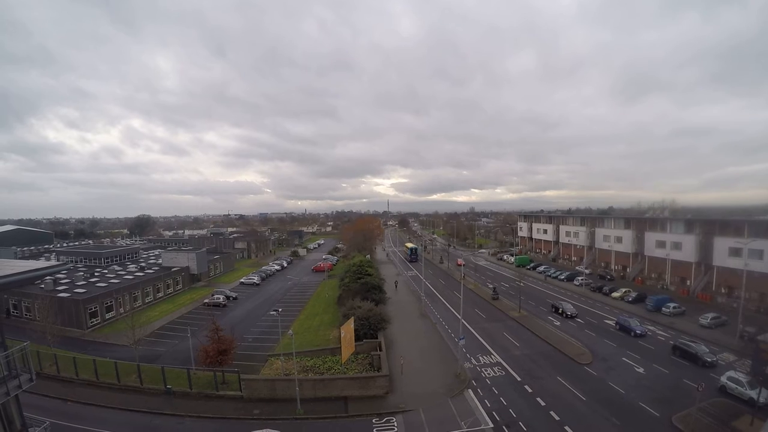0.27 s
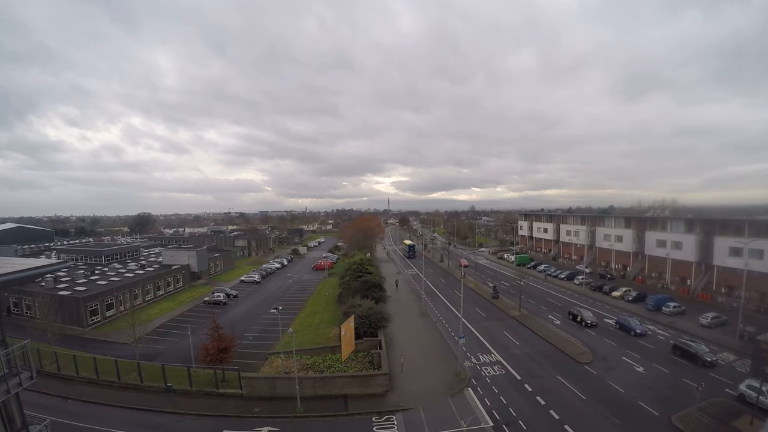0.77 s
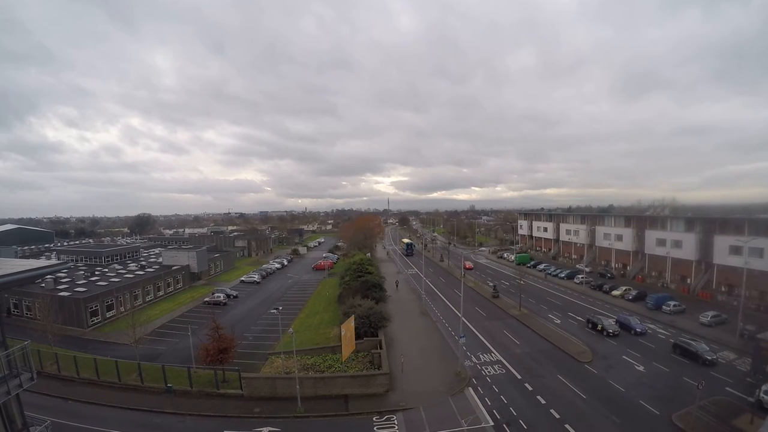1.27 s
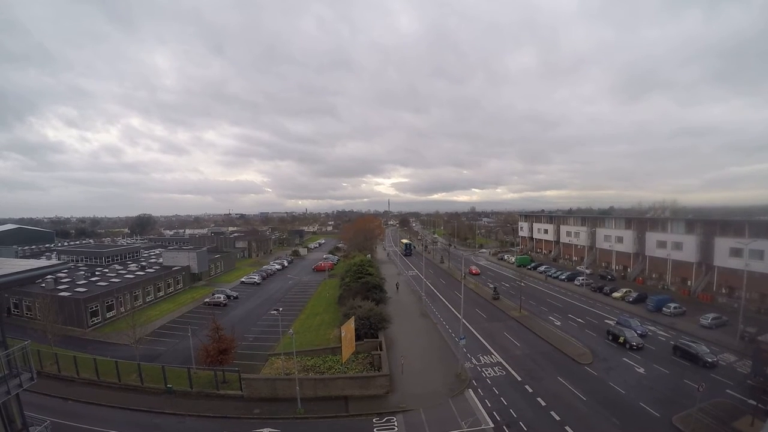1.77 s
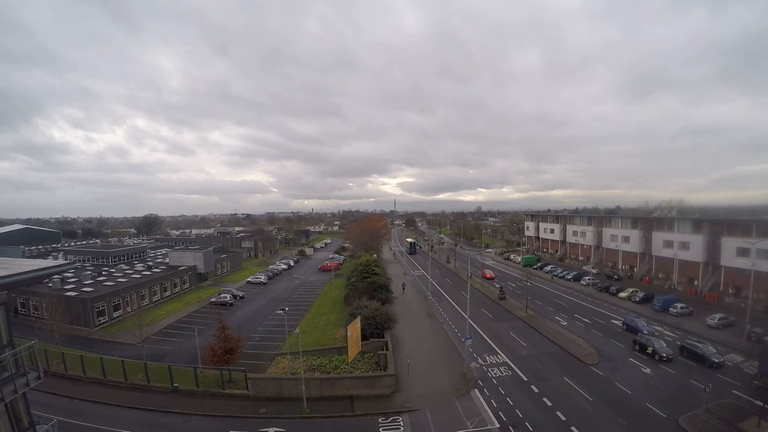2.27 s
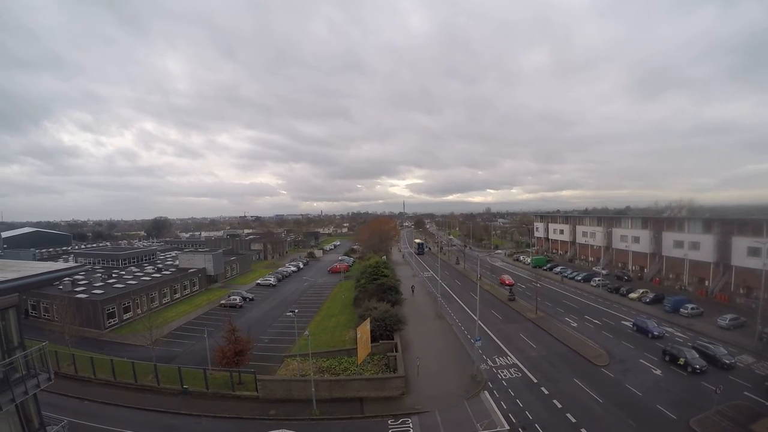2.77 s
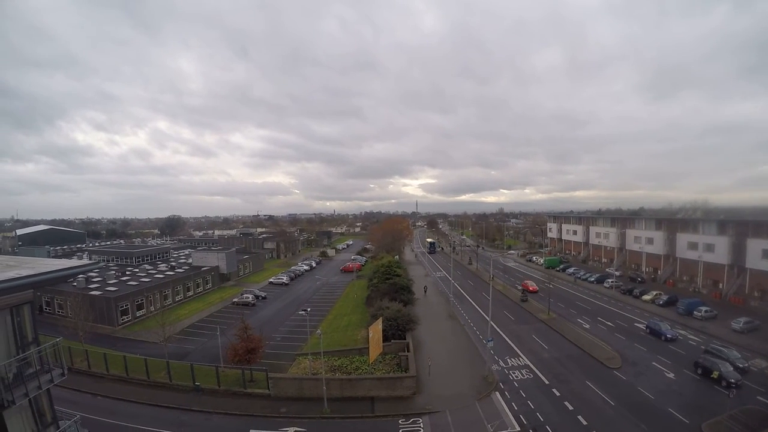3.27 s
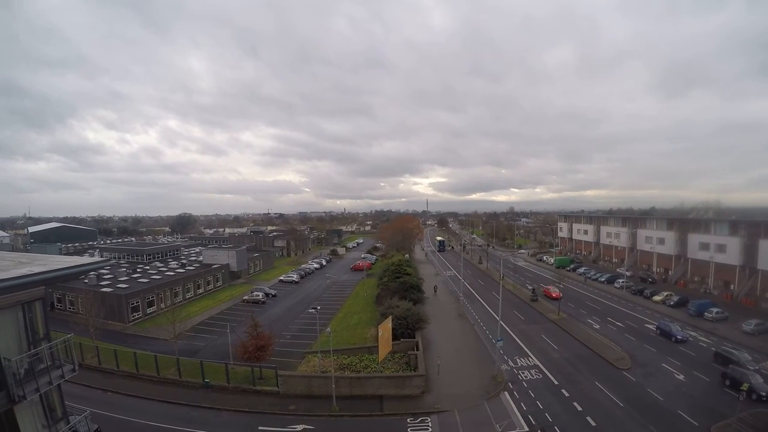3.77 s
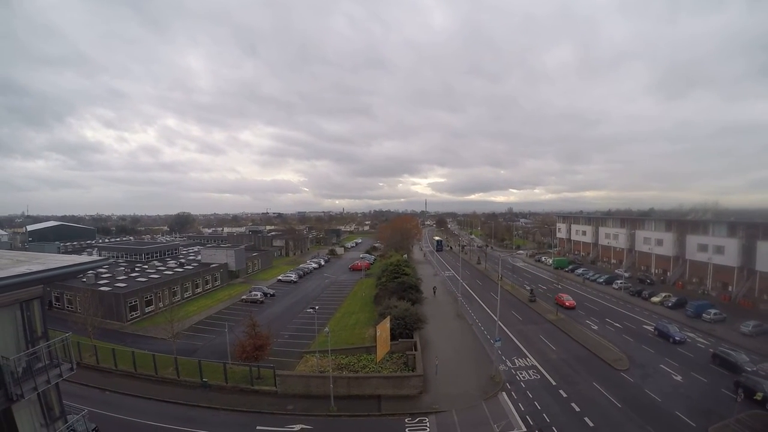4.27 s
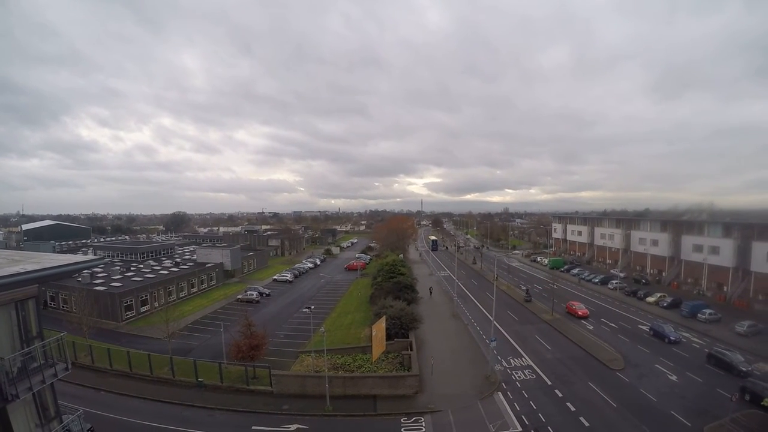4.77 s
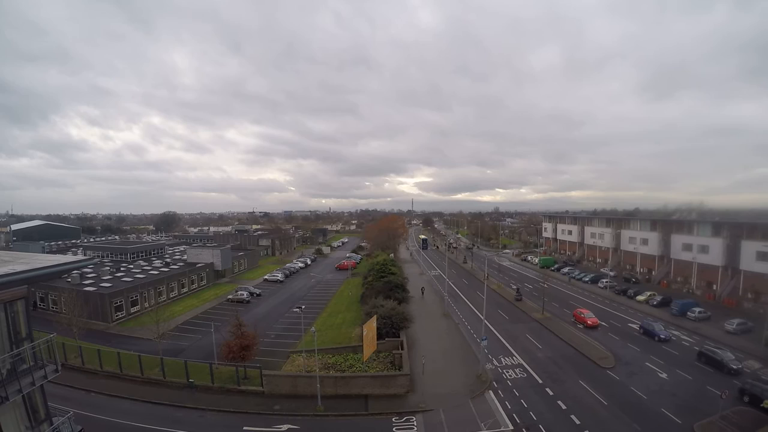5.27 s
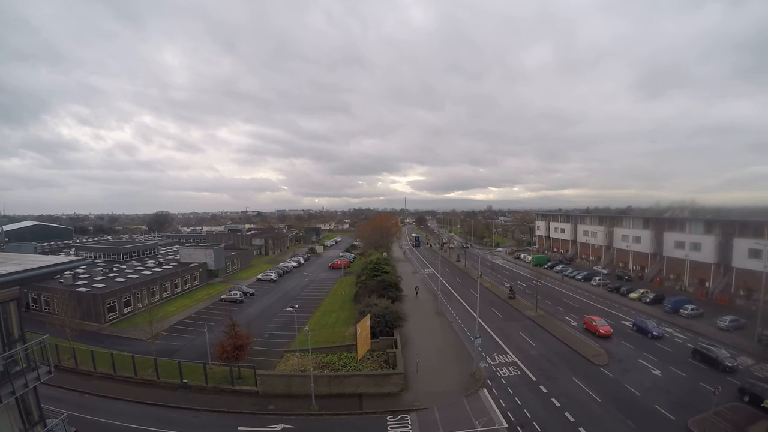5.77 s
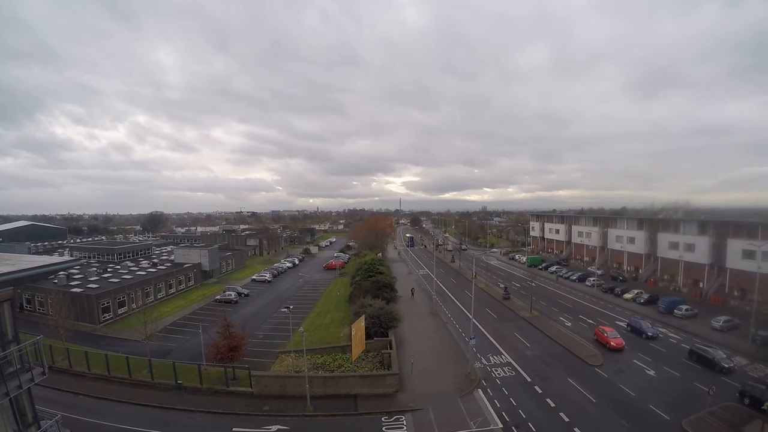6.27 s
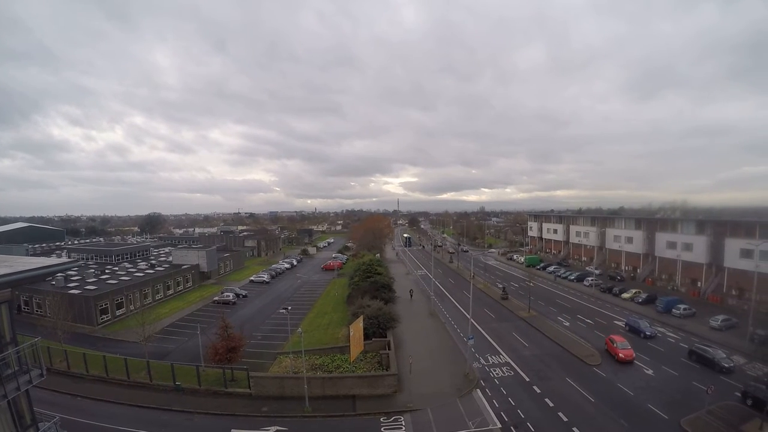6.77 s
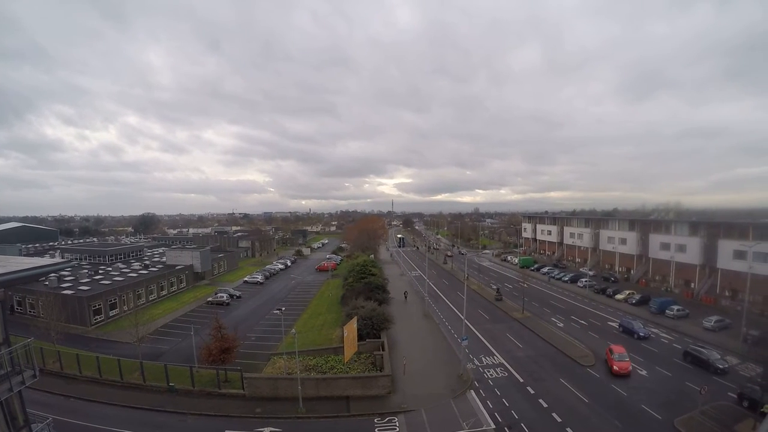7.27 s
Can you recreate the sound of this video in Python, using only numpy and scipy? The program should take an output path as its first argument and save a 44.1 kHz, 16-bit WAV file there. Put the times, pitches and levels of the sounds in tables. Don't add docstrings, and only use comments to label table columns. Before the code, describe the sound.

Open urban outdoors, small boxy camera microphone high above traffic. Continuous tyre and engine rumble sits under irregular low wind buffets. A turning wheel squeaks about eight times a second, growing fainter. An airy brake release comes early; an engine note sinks around five seconds, then a shorter, louder brake puff chirps. The close brings a thud, dense metallic clatter and brief singing squeal.

```python
import sys
import numpy as np
from scipy import signal
from scipy.fft import rfft, irfft
from scipy.io import wavfile
from scipy.ndimage import uniform_filter1d

SR = 44100
rng = np.random.default_rng(int(sys.argv[2]) if len(sys.argv) > 2 else 0)


def generate_wav(sig):
    pcm = np.round(np.clip(np.atleast_2d(sig).T, -1, 1) * 32767).astype(np.int16)
    wavfile.write(sys.argv[1], SR, pcm)


def invert_db(level):
    return 10 ** (np.asarray(level, dtype=float) / 20)


N = 331191
TIME = np.arange(N) / SR
HZ = np.maximum(np.arange(N // 2 + 1) * SR / N, 1)


def unit(x):
    return x / np.sqrt(np.mean(x ** 2))


def colour(points):
    hz, db = np.transpose(points)
    return invert_db(np.interp(np.log(HZ), np.log(hz), db, left=-140, right=-140))


def peaks(table):
    return invert_db(sum(db / (1 + (2 * (HZ - hz) / width) ** 2) for hz, width, db in table))


def shaped(x, gain):
    return unit(irfft(rfft(x) * gain, N))


def noise_of(points):
    return shaped(rng.standard_normal(N), colour(points))


def smooth_twice(x, span):
    return uniform_filter1d(uniform_filter1d(x, span), span)


def walk(rate):
    k = int(SR / rate)
    levels = np.repeat(rng.standard_normal(N // k + 1), k)
    return unit(smooth_twice(levels, k)[:N])


def steady(x, span):
    return unit(x / np.sqrt(smooth_twice(x ** 2, int(span * SR)) + 0.017))


def hold(table):
    s, db = np.transpose(table)
    return invert_db(np.interp(TIME, s, db))


def burst(s, db, rise, hold_s, fade):
    return invert_db(db - rise * np.maximum(s - TIME, 0) - fade * np.maximum(TIME - s - hold_s, 0))


def bumps(table, column):
    t = TIME[::64]
    power = sum(invert_db(row[column] - 24 * ((t - row[0]) / row[-1]) ** 2) ** 2 for row in table)
    return np.interp(TIME, t, power)


def tone(table, waver):
    s, hz, db = np.transpose(table)
    level = invert_db(np.interp(TIME, s, db, left=-140, right=-140))
    pitch = np.interp(TIME, s, hz) * (1 + waver * walk(150.))
    return level * np.sin(2 * np.pi * np.cumsum(pitch) / SR)


def patchy(gain, shared_db, own_db, rate):
    spectrum, common, out = rfft(rng.standard_normal(N)) * gain, walk(rate), 0
    place = 2 * np.log2(HZ)
    for band in range(12, 29):
        share = np.cos(np.pi / 2 * np.clip(place - band, -1, 1)) ** 2
        flicker = invert_db(shared_db * common + own_db * walk(rate))
        out = out + irfft(spectrum * share, N) * flicker
    return unit(out)


def traffic():
    # (frequency [Hz], density [dB per Hz])
    roar_colour = [(70, -34), (130, -18.5), (165, -1), (240, 0), (360, -4), (445, -3), (520, -10.5),
                   (750, -11), (840, -10), (1050, -11.5), (1330, -14.5), (2570, -20.5), (2980, -16),
                   (3350, -41)]
    # (frequency [Hz], density [dB per Hz])
    hiss_colour = [(2600, -23), (3100, 0.5), (4100, -1), (4900, -4), (5500, -8), (6500, -11.5), (7900, -15),
                   (8700, -21.5), (11000, -30)]
    # (time [s], level re mean [dB])
    flow_levels = [
        (0, .3),
        (.6, -.2),
        (2.3, .8),
        (3.3, -.4),
        (4.25, -.5),
        (4.85, .3),
        (5.5, -.7),
        (6.4, -.3),
        (7.1, .4),
    ]
    roar_db, hiss_db, hiss_follow = -39.8, -59, 1.3
    roar = patchy(colour(roar_colour), .12, 0.4, rate=5.)
    hiss = patchy(colour(hiss_colour), 0.3, 0.45, rate=11.)
    flow = hold(flow_levels)
    return roar * invert_db(roar_db) * flow + hiss * invert_db(hiss_db) * flow ** hiss_follow


def housing(sound):
    # (frequency [Hz], width [Hz], gain [dB])
    resonances = [(458, 206, 2.5), (632, 31, 1), (760, 44, -7.5), (895, 72, 3), (1074, 95, 3),
                  (1483, 81, 2.5), (1945, 86, 2.5), (2200, 70, 0), (2590, 96, 4.5), (3000, 280, -4),
                  (5850, 130, 3.5)]
    return irfft(rfft(sound) * peaks(resonances), N)


def buffeting(blow):
    # (frequency [Hz], density [dB per Hz])
    rumble_colour = [(8, -18.5), (20, -3), (45, 0.5), (70, -10), (110, -36), (200, -68.5)]
    # (time [s], level [dB], length [s])
    puffs = [(0.0, -23, .04), (0.22, -23, .05), (0.35, -22, .05), (0.44, -21, .08), (0.63, -19.5, .08),
             (0.96, -25, .05), (1.05, -26.5, .05), (1.15, -26, .07), (1.42, -24, .05), (1.53, -24.5, .05),
             (1.645, -22.5, .05), (1.76, -26, .07), (1.97, -23.5, .07), (2.32, -23, .1), (2.98, -25, .07),
             (4.08, -22.5, .04), (4.2, -22, .05), (4.31, -20.5, .05), (4.51, -19, .05), (4.585, -17.5, .05),
             (4.7, -20, .08), (5.67, -20.5, .06), (5.85, -26, .05), (5.95, -23, .06), (6.155, -13.5, .07),
             (6.24, -21, .07), (6.67, -23, .04), (6.78, -23, .06), (7.04, -21, .07), (7.35, -19.5, .07)]
    # (time [s], depth [dB], length [s])
    lulls = [
        (.29, 9, .04),
        (.89, 4, .05),
        (1.25, 5, .06),
        (2.88, 9, .06),
        (3.27, 5, .07),
        (4.82, 5, .04),
        (5.07, 7, .05),
        (5.49, 5, .05),
        (6.6, 10, .04),
        (6.92, 4, .05),
    ]
    flutter_db, flutter_rate = 1.6, 17.
    rumble = steady(noise_of(rumble_colour), 0.029)
    swing = (blow * invert_db(flutter_db * walk(flutter_rate))) ** 2 + bumps(puffs, column=1)
    calm = invert_db(-sum(db * np.exp(-((TIME - s) / length) ** 2) for s, db, length in lulls))
    return rumble * np.sqrt(swing) * calm


def eddies(blow):
    # (frequency [Hz], density [dB per Hz])
    large_colour = [(50, -36), (75, 0), (105, -2), (135, -21.5), (250, -42)]
    # (frequency [Hz], density [dB per Hz])
    small_colour = [(85, -22), (118, -2.5), (150, -6), (200, -23), (400, -39)]
    # (time [s], large level [dB], small level [dB], length [s])
    shed_times = [(0.0, -29, -48, .04), (.12, -34.5, -46, .08), (.33, -36, -37, .07), (.47, -42, -32, .06),
                  (.56, -28, -35, .08), (.645, -29, -31, .07), (.88, -35, -43, .12), (1.09, -38, -40, .12),
                  (1.22, -35.5, -53, .08), (4.03, -34, -44, .07), (1.94, -34, -45, .05),
                  (2.15, -35, -39, .06), (2.28, -33, -48, .09), (2.76, -32, -44, .1), (3.1, -35, -41, .1),
                  (3.66, -35, -43, .12), (4.24, -39, -38, .08), (4.44, -28, -30.5, .07),
                  (4.56, -22, -34, .07), (4.69, -27, -33, .11), (4.93, -40, -55, .18),
                  (5.33, -38, -55, .07), (5.69, -29, -27.5, .05), (5.84, -30, -29, .06),
                  (5.94, -31, -44, .08), (6.165, -19.5, -33, .07), (6.5, -34, -41, .12),
                  (6.77, -36, -39, .06), (7.16, -35, -46, .06), (7.44, -33, -38, .08)]
    large_db, small_db, mean_wind_db, follow = -42, -46, -30, .15
    flutter_db, flutter_rate = 1.6, 16.
    shed = (blow / invert_db(mean_wind_db)) ** follow
    large = steady(noise_of(large_colour), 0.026)
    small = steady(noise_of(small_colour), 0.032)
    large_power = (shed * invert_db(large_db + flutter_db * walk(flutter_rate))) ** 2 + bumps(shed_times, column=1)
    small_power = (shed * invert_db(small_db + flutter_db * walk(flutter_rate))) ** 2 + bumps(shed_times, column=2)
    return large * np.sqrt(large_power) + small * np.sqrt(small_power) * invert_db(-1.5)


def slaps():
    # (frequency [Hz], density [dB per Hz])
    slap_colour = [(130, -15), (190, 7), (300, -1), (450, -7), (540, -18)]
    # (start time [s], level [dB], length [s])
    strikes = [
        (0.603, -49, 0.084),
        (2.126, -41, 0.037),
        (4.425, -38, 0.067),
        (4.512, -29, 0.087),
        (4.619, -35.5, 0.053),
        (5.82, -42, 0.05),
        (6.122, -29.5, 0.075),
        (.52, -40, .05),
        (7.24, -40, .04),
        (7.295, -36, .035),
    ]
    slap = steady(noise_of(slap_colour), 0.018)
    strength = sum(invert_db(db) * np.sin(np.pi * np.clip((TIME - s) / length, 0, 1)) ** 2
                   for s, db, length in strikes)
    return slap * strength


def wind():
    # (time [s], level [dB])
    strength = [(0, -31), (.3, -37), (.52, -24), (.8, -31), (1.3, -34), (1.8, -30), (2.2, -26.5),
                (2.85, -36), (3.1, -29), (3.3, -34), (3.9, -31), (4.45, -24), (4.8, -32), (5.3, -30),
                (5.5, -37), (6.2, -26), (6.7, -28), (7.51, -24)]
    start_share = .42
    blow = hold(strength)
    opening = np.sin(np.pi / 2 * np.clip(TIME / .02, 0, 1)) ** 2
    return (buffeting(blow) + eddies(blow) + slaps()) * (start_share + (1 - start_share) * opening)


def self_noise():
    # (frequency [Hz], density [dB per Hz])
    hiss_colour = [(3000, -4), (7000, -2), (9000, 0.5), (11000, -1), (14500, -4.5), (15500, -7)]
    return noise_of(hiss_colour) * invert_db(-72.5)


def whine():
    # (frequency [Hz], level [dB rms])
    whine_tones = [(10262, -91), (10287, -90)]
    return sum(invert_db(db + 3) * np.sin(2 * np.pi * hz * TIME) for hz, db in whine_tones)


def squeaks():
    # (time [s], level [dB], whistle re rasp [dB])
    rubs = [(0.0628, -49.5, -5), (0.1864, -51, -5), (0.3272, -53, -5), (0.443, -49, -7),
            (0.5801, -48.5, -5), (0.6994, -53, -5), (0.84, -54, -5), (0.95, -53, -9), (0.98, -53, -1),
            (1.04, -52, -1), (1.0929, -47, 0), (1.198, -47, -9), (1.331, -48.5, -14), (1.4406, -55, -5),
            (1.5748, -50, -3), (1.6786, -50, -5), (1.7994, -52, -3), (1.9494, -54, -5), (2.063, -52, -5),
            (2.17, -53, -5), (2.394, -54, -5), (2.5611, -51, -5), (2.6673, -52, -5), (4.1754, -56, -5),
            (4.4533, -54, -8), (4.8754, -55, -5), (5.0394, -55, -5), (5.1806, -54, -5), (5.3542, -55, -5),
            (5.8004, -55, -5)]
    # (time [s], level [dB])
    faint_rubs = [(1.385, -55), (2.75, -56), (2.868, -57), (2.99, -57), (3.136, -57), (3.374, -57),
                  (3.4765, -58), (3.61, -58), (3.73, -58), (3.8686, -57), (4.515, -57), (4.7486, -56),
                  (5.663, -57), (6.6657, -56), (6.749, -57), (7.0678, -55)]
    # (frequency [Hz], density [dB per Hz])
    rasp_colour = [(4500, -33), (5300, -7.5), (6000, -9.5), (7000, -15), (8000, -11.5), (8700, -23.5),
                   (10500, -24.5), (12000, -35)]
    # (frequency [Hz], width [Hz], gain [dB])
    pad_rings = [(5750, 220, 4), (6470, 250, 4), (7000, 250, 4), (7500, 250, 3), (7950, 300, 4)]
    rub_s, whistle_hz, whistle_scatter = .05, 5800, .01
    ring_scatter, ring_scatter_db, faint_whistle_db = .025, 2.5, -6
    rows = rubs + [(s, db, faint_whistle_db) for s, db in faint_rubs]
    t = np.arange(int(rub_s * SR)) / SR
    press = np.sin(np.pi * (t / t[-1]) ** 0.55) ** 2.2
    hz = np.arange(len(t) // 2 + 1) * SR / len(t)
    rasp_gain, out = np.interp(hz, HZ, colour(rasp_colour)), np.zeros(N)
    ring_hz, width, ring_db = np.transpose(pad_rings)[:, :, None]
    for s, db, whistle_db in rows:
        noise = rng.standard_normal(len(t))
        chance = rng.standard_normal((3, len(pad_rings), 1))
        shape = 1 + (2 * (hz - ring_hz * (1 + ring_scatter * chance[0])) / width) ** 2
        rings = invert_db(np.sum((ring_db + ring_scatter_db * chance[1]) / shape, axis=0))
        rasp = unit(irfft(rfft(noise) * rasp_gain * rings, len(t)))
        pitch = whistle_hz * (1 + whistle_scatter * chance[2, 0])
        whistle = invert_db(whistle_db) * np.sin(2 * np.pi * pitch * t)
        start = int(s * SR)
        out[start:start + len(t)] += invert_db(db - 10.8) * press * (rasp + whistle)
    return np.roll(out, -int(.006 * SR))


def release(body, bright, air, jet):
    return noise_of(air) * burst(*body) + noise_of(jet) * burst(*bright)


def brakes():
    # (frequency [Hz], density [dB per Hz])
    first_air = [(3500, -8), (5500, 1), (7600, 1), (9000, -3), (10400, -.5), (11500, -1), (12500, -10),
                 (14500, -20)]
    second_air = [(2000, -7), (2900, 5), (3400, -6.5), (4050, 3), (4900, -3.5), (5600, -11), (7000, -23),
                  (9000, -26)]
    # (frequency [Hz], density [dB per Hz])
    first_jet = [(7000, -10), (10000, 0), (12500, -1), (14500, -5), (15500, -12)]
    second_jet = [(4000, -7), (5000, 3), (6500, -4), (7600, -4), (8600, -15.5), (11000, -16), (13000, -28)]
    # (time [s], frequency [Hz], level [dB])
    valve = [
        (6.225, 2800, -75),
        (6.238, 2800, -52),
        (6.254, 2780, -54),
        (6.257, 2400, -51),
        (6.268, 2385, -47),
        (6.284, 2350, -50),
        (6.296, 2330, -75),
    ]
    first = release((2.238, -59, 1200, .07, 42), (2.238, -67.5, 1200, .12, 80), first_air, first_jet)
    second = release((6.256, -48.5, 450, .075, 150), (6.262, -53, 400, .015, 200), second_air, second_jet)
    return first + second + invert_db(2.5) * tone(valve, .0025)


def engine():
    # (time [s], frequency [Hz], level [dB])
    note = [
        (4.76, 92, -60),
        (4.84, 88, -35),
        (5.0, 80, -34),
        (5.15, 73, -35),
        (5.3, 66, -38),
        (5.42, 62, -60),
    ]
    return invert_db(.6) * tone(note, .03)


def knock():
    # (frequency [Hz], level [dB], t60 [s])
    thud = [(275, -35, .13), (415, -31, .15), (630, -34, .14), (820, -41, .12), (1100, -37, .15),
            (1980, -43, .12)]
    t = np.maximum(TIME - 7.183, 0)
    ring = sum(invert_db(db - 60 * t / t60) * np.sin(2 * np.pi * hz * t) for hz, db, t60 in thud)
    return invert_db(8) * ring * (1 - np.exp(-t / 0.011)) ** 2


def rattle():
    # (frequency [Hz], density [dB per Hz])
    load_colour = [(130, -14), (190, 4), (500, -2), (1200, 1), (2000, 1), (2900, 3.5), (3300, -6),
                   (4400, -9), (5200, -14), (6500, -30), (8000, -44)]
    # (frequency [Hz], width [Hz], gain [dB])
    load_rings = [(630, 80, 9), (1100, 100, 1), (1240, 80, 3), (1420, 80, 6), (2010, 100, 5),
                  (2180, 120, 3), (2350, 100, 3), (2650, 130, 8), (4400, 200, 0)]
    # (full at [s], level [dB], rise [dB/s], hold [s], fade [dB/s])
    jolts = [
        (7.195, -42, 550, .065, 320),
        (7.31, -41, 500, .04, 50),
        (7.47, -48, 150, .1, 100),
    ]
    # (time [s], level [dB])
    single_bumps = [
        (7.1942, -39),
        (7.2077, -39),
        (7.2207, -36),
        (7.2481, -39),
        (7.3015, -40),
        (7.3155, -39),
        (7.352, -40),
        (7.375, -39),
    ]
    bump_rise, bump_fade = 3000, 900
    ticks = rng.standard_normal(N) * invert_db(2.1 * rng.exponential(size=N) + 0.79 * walk(60.))
    jolt_power = sum(burst(*jolt) ** 2 for jolt in jolts)
    bump_power = sum(burst(s, db, bump_rise, 0, bump_fade) ** 2 for s, db in single_bumps)
    return shaped(ticks, colour(load_colour) * peaks(load_rings)) * np.sqrt(jolt_power + bump_power)


def panel():
    # (time [s], frequency [Hz], level [dB])
    song = [
        (7.295, 2640, -70),
        (7.308, 2640, -47),
        (7.335, 2700, -45),
        (7.36, 2720, -48),
        (7.39, 2700, -47),
        (7.412, 2620, -49),
        (7.43, 2550, -70),
    ]
    return tone(song, .012)


def treble_dips(x):
    dip_hz, surge = 12800, 2.25
    power = uniform_filter1d(x ** 2, int(.008 * SR))
    jump = power > surge * uniform_filter1d(power, int(.15 * SR)) + invert_db(-46)
    dipped = uniform_filter1d(1. * jump, int(.016 * SR)) > 0
    gate = uniform_filter1d(dipped, int(.003 * SR), output=float)
    top_band = signal.sosfiltfilt(signal.butter(8, dip_hz, "high", fs=SR, output="sos"), x)
    return x - gate * top_band


def scene():
    road = housing(traffic())
    clatter = knock() + rattle() + panel()
    return (road + wind() + squeaks() + brakes() + engine() + clatter)[None]


def low_pass(x):
    return signal.sosfilt(signal.butter(12, 15290, fs=SR, output="sos"), x)


def record(dry):
    return low_pass(treble_dips(dry + whine() + self_noise()))


dry = scene()
out = record(dry)
generate_wav(out)
```